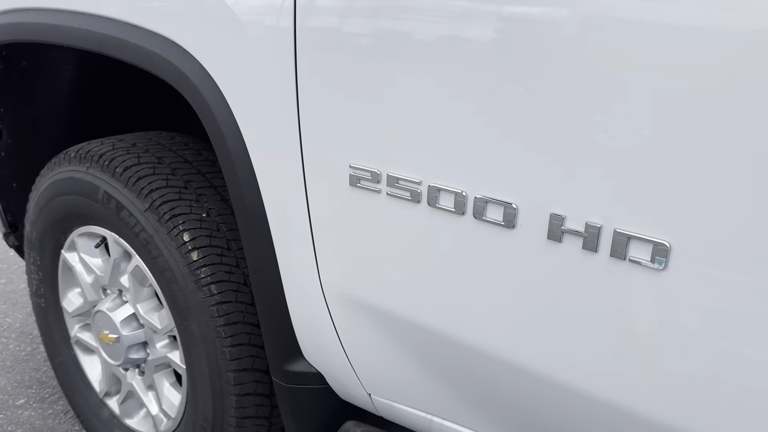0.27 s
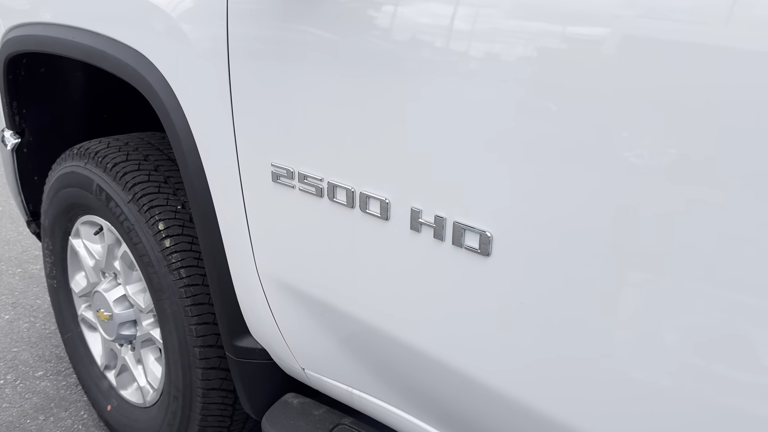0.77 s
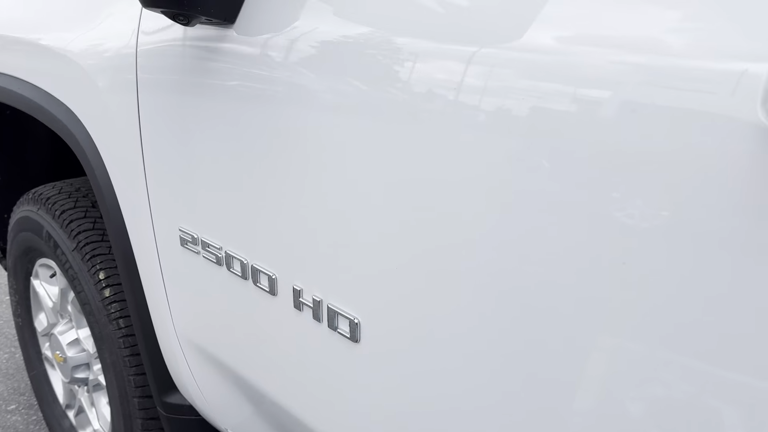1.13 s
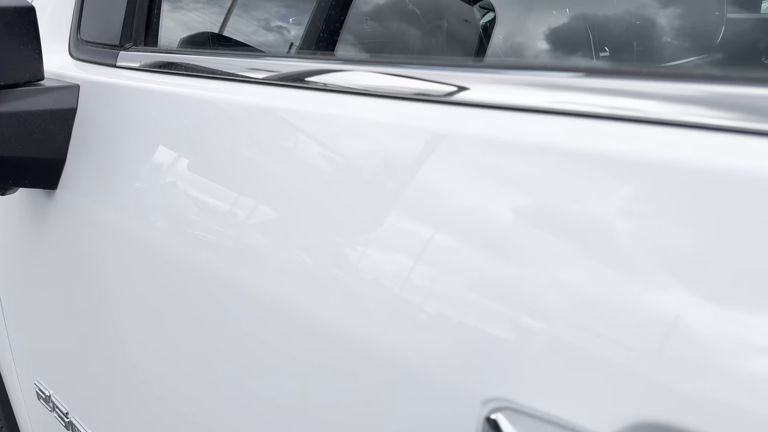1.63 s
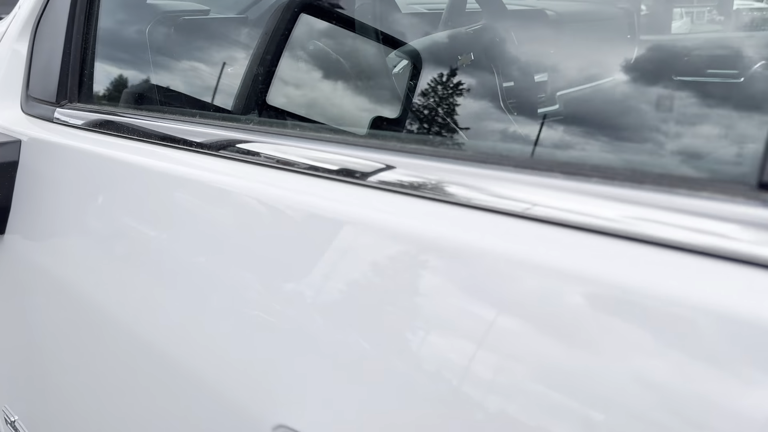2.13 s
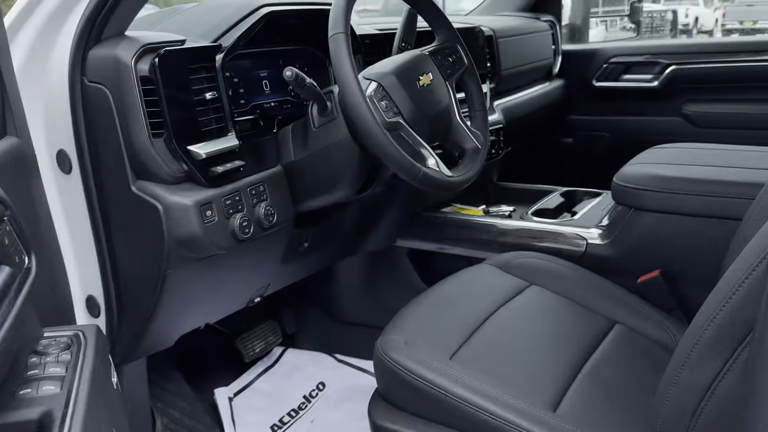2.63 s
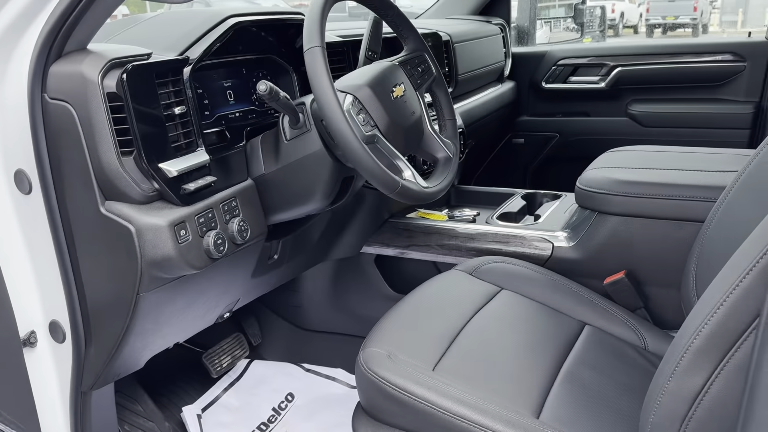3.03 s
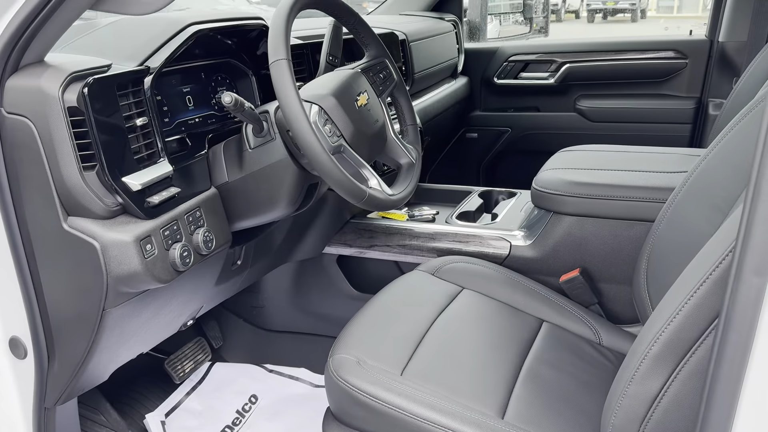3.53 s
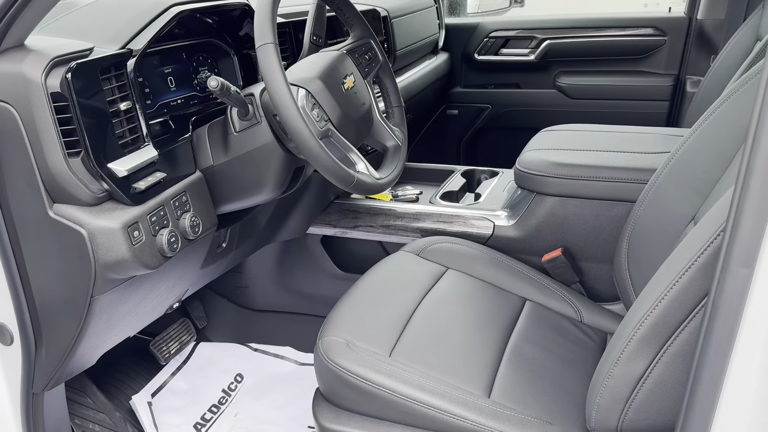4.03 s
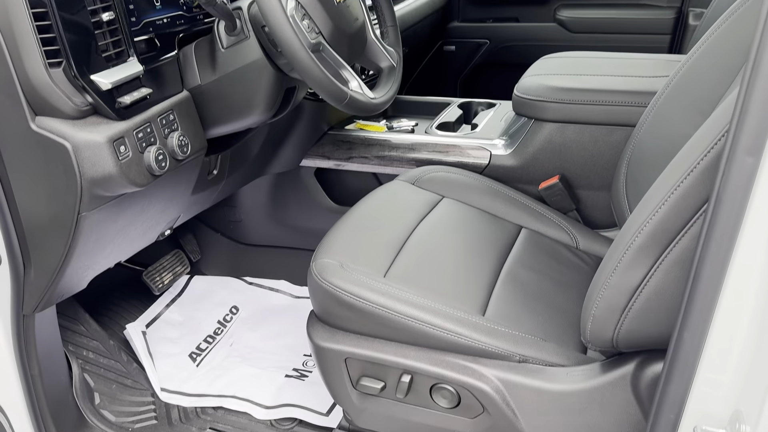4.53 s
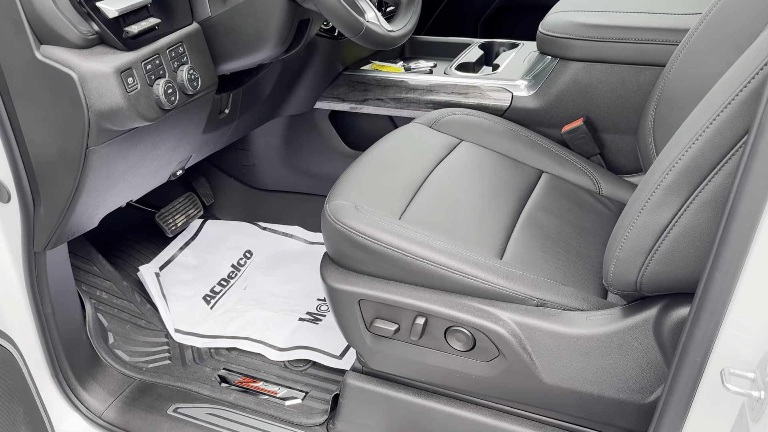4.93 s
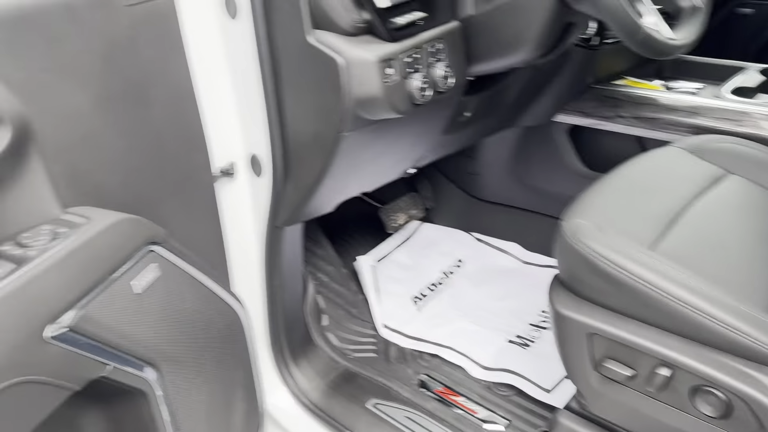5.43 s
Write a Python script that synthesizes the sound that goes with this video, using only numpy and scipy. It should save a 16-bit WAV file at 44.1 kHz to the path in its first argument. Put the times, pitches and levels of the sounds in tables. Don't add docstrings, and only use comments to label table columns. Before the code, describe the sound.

Outdoors, a rough diesel idle rattles on; a door handle is pulled, the latch clacks loudly, then low wind thumps follow and fade.

```python
import sys
import numpy as np
from scipy import signal
from scipy.fft import rfft, irfft, next_fast_len
from scipy.io import wavfile
from scipy.ndimage import uniform_filter1d, map_coordinates

SR = 44100
rng = np.random.default_rng(int(sys.argv[2]) if len(sys.argv) > 2 else 0)


def store_wav(level_fs):
    pcm = np.round(np.clip(np.atleast_2d(level_fs), -1, 1) * 32767)
    wavfile.write(sys.argv[1], SR, pcm.T.astype(np.int16))


def how_loud(loudness_db):
    steps = np.asarray(loudness_db, float) / 20
    return 10 ** steps


N = 251370
T = np.arange(N) / SR
CYCLE_HZ = 5.0025
NOTCH_HZ, NOTCH_WIDTH_HZ = 8900, 900


def unit(x):
    return x / np.sqrt(np.mean(x ** 2) + 1e-20)


def along(points, hz):
    point_hz, value = np.transpose(points)
    return np.interp(np.log(hz + 1), np.log(point_hz + 1), value)


def curves(rows):
    start_s, *columns = np.transpose(rows)
    return [np.interp(T, start_s, column) for column in columns]


def wobble(rate_hz):
    knots = rng.standard_normal(int(N * rate_hz / SR) + 4)
    return map_coordinates(knots, [T * rate_hz])


def filtered(x, response):
    m = next_fast_len(x.shape[-1] + 8192)
    spectrum = rfft(x, m) * response(np.fft.rfftfreq(m, 1 / SR))
    return irfft(spectrum, m)[..., :x.shape[-1]]


def bell(centre_hz, width_hz):
    return lambda hz: 1 / (1 + ((hz - centre_hz) / width_hz) ** 4)


def ports(mid, side):
    return np.array([mid + side, mid - side])


def panned(x, left_right_db):
    return x * how_loud([[left_right_db / 2], [-left_right_db / 2]])


def add_at(out, start_s, sound):
    place = out[:, round(start_s * SR):][:, :sound.shape[-1]]
    place += sound


# start_s, level_db, screen_db (bodywork)
ENGINE = [(0, -45.5, -0.5), (.73, -44.5, 1), (1.06, -42.5, 4.5), (1.65, -43, 10), (2.05, -42, 10),
          (2.4, -45.5, 5.5), (2.82, -47, 3.5), (3.3, -45.5, 5), (3.95, -44.5, 6.5), (4.9, -44, 6.5),
          (5.7, -43.5, 7)]
CLATTER_DB, CLATTER_SCREENED = 4.5, 1.06
HISS_DB, HISS_SCREENED = -2.5, 1.02
HISS_LAG_S = 0.12


def engine_levels():
    level_db, screen_db = curves(ENGINE)
    late_db = np.interp(T - HISS_LAG_S, T, screen_db)
    clatter_db = level_db + CLATTER_DB - CLATTER_SCREENED * screen_db
    hiss_db = level_db + HISS_DB - HISS_SCREENED * late_db
    return level_db, clatter_db, hiss_db


# freq_hz, density_db_per_hz
BLOCK = [(290, -19), (500, -10), (700, -6.5), (950, -8), (1210, -10), (1350, -12.5), (1500, -11.5),
         (1810, -14.5), (2680, -16), (3910, -25.5), (6970, -27), (8530, -37.5), (13000, -31), (15700, -25)]
# freq_hz, density_db_per_hz
BLOCK_SIDE = [(210, -33), (350, -7), (497, -6), (547, -6), (574, -6), (816, -1.5), (2420, -15), (2620, -14),
              (4650, -26.5), (7630, -18.5), (10200, -22.5), (14700, -26), (15900, -31)]
# freq_hz, share
LAG = [(400, .1), (3000, 0.35), (6000, 0.66), (8000, .9), (15000, .85)]


def engine_at_ports():
    a, b = rng.standard_normal((2, N))
    share = lambda hz: np.clip(along(LAG, hz), 0, .99)
    mid = filtered(a, lambda hz: how_loud(along(BLOCK, hz)))
    side = filtered(a, lambda hz: 1j * share(hz) * how_loud(along(BLOCK_SIDE, hz)))
    side += filtered(b, lambda hz: np.sqrt(1 - share(hz) ** 2) * how_loud(along(BLOCK_SIDE, hz)))
    return ports(unit(mid), how_loud(-2.0) * unit(side))


CYLINDERS = [2.8, 3.3, 3.6, 2.6, 1.3, 2.6, 1.6, .8]
NOTCH_DEPTH = .6


def engine_noise():
    block_db, clatter_db, hiss_db = engine_levels()
    turn = T * CYCLE_HZ * 8 + 0.41
    puff_db = np.asarray(CYLINDERS)[turn.astype(int) % 8] + 2.8 * np.cos(2 * np.pi * (turn - .5))
    puff_db = uniform_filter1d(puff_db, size=200) + .7 * wobble(30)
    pair = engine_at_ports()
    high = filtered(pair, lambda hz: 1 / (1 + (6000 / (hz + 1)) ** 3))
    low = filtered(pair, bell(0, 950))
    roar = low * how_loud(block_db + 2.0 + 0.25 * wobble(2.8))
    clatter = (pair - low - high) * how_loud(clatter_db + 3 + 0.44 * puff_db + 0.43 * wobble(8))

    near = np.clip(1 - T / 1.4, 0, 1)
    rattle = near * how_loud(2.5) * np.exp(4 * np.cos(2 * np.pi * (T * CYCLE_HZ - .26)) - 4)
    clatter += rattle * filtered(clatter, bell(1300, 350))

    notch = filtered(high.mean(axis=0), bell(NOTCH_HZ, NOTCH_WIDTH_HZ))
    high = high - NOTCH_DEPTH * np.sqrt(near) * notch
    jets = how_loud(-6) * filtered(high, bell(14300, 1000))
    hiss = how_loud(hiss_db + 8) * (high * how_loud(0.3 * puff_db) + jets * how_loud(2.46 * puff_db))
    return roar + clatter + hiss


# place_in_cycle (0-1), mode_hz, level_db, t60_s, left_right_db
KNOCKS = [(.27, 720, -1.5, .24, 1), (.82, 722, -3, .24, 1), (.55, 725, -5, .16, 0), (.1, 1188, .5, .08, 0),
          (.33, 1195, -5, .08, 0), (.16, 1468, -5.5, .12, 0), (.27, 1500, -5.5, .12, 0),
          (.65, 855, -5, .18, 0), (.85, 668, -5, .12, 0), (.13, 5520, -15, .05, 2),
          (.63, 5500, -15, .05, 2)]


def knocks():
    out, t = np.zeros((2, N + SR)), np.arange(SR // 4) / SR
    for place, mode_hz, level_db, t60_s, left_right_db in KNOCKS:
        for cycle, (size, detune) in enumerate(rng.standard_normal((29, 2))):
            decay = how_loud(level_db - 38 + .6 * size - 60 * t / t60_s)
            attack = 1 - np.exp(-t / 0.0024)
            ring = decay * attack * np.sin(2 * np.pi * mode_hz * (1 + .004 * detune) * t)
            add_at(out, (cycle + place) / CYCLE_HZ, panned(ring, left_right_db))
    return out[:, :N]


# freq_hz, width_hz, level_db
WHINES = [(2310, 11, -63.5), (2607, 22, -61.5), (3410, 19, -67), (878, 33, -56.5), (5520, 42, -74.5),
          (4000, 390, -67), (6100, 23, -85)]
WHINE_SCREENED, DOOR_OPEN_S, DOOR_OPEN_DB = 0.59, 3.7, 3


def whines():
    screen_db = curves(ENGINE)[1]
    clear_db = 3.1 - WHINE_SCREENED * screen_db + DOOR_OPEN_DB * np.tanh(T - DOOR_OPEN_S)
    out = np.zeros(N)
    for freq_hz, width_hz, level_db in WHINES:
        gain = how_loud(level_db + clear_db + 2.2 * wobble(3.02))
        resonance = lambda hz: 1 / (1 + ((hz - freq_hz) / width_hz) ** 2)
        out += gain * unit(filtered(rng.standard_normal(N), resonance))
    return out


def engine_tones():
    level = how_loud(curves(ENGINE)[0] + 45.5)
    return level * (knocks() + whines())


# start_s, level_db, echo_db (strongest line, off the truck's flank)
DRONE = [(0, -33.5, 2), (.3, -32.5, 2), (1.2, -32.5, -2), (1.5, -32, 0), (1.7, -42, 11.5),
         (2.2, -39.5, 9.5), (2.8, -28.5, -2), (3.2, -36, -10), (3.7, -39.5, 0.5), (4.35, -42, -16),
         (4.47, -39, 5.5), (4.8, -39, 11.5), (5.1, -32.5, 4), (5.4, -30.5, -1), (5.7, -33, -1.5)]
# shaft_multiple, level_db
DRONE_ORDERS = [(2, -0.5), (3, 0), (4, -16), (5, -13.5), (6, -11), (9, -14.5), (12, -19), (15, -23.5),
                (18, -26)]
# cycle_multiple, level_db
FIRING = [(8, -11), (12, -8), (16, -3.5), (24, -13)]
DRONE_HZ, DRONE_SAG_HZ_PER_S = 100.04, .33
LOW_LINES_DB, OVERTONES_DB = -1.5, 0.2


def drone():
    level_db, echo_db = curves(DRONE)
    main_db, low_db, high_db = level_db + echo_db, level_db + LOW_LINES_DB, level_db + OVERTONES_DB
    shaft_hz = (DRONE_HZ - DRONE_SAG_HZ_PER_S * T) / 3
    shaft = 2 * np.pi * np.cumsum(shaft_hz) / SR
    lines = []
    for order, order_db in DRONE_ORDERS:
        shade_db = main_db if order == 3 else low_db if order < 5.5 else high_db
        lines.append((shade_db + order_db, order * shaft))
    for order, order_db in FIRING:
        lines.append((low_db + order_db, 2 * np.pi * order * CYCLE_HZ * T))
    out = np.zeros(N)
    for line_db, phase in lines:
        out += how_loud(line_db + 1.5 + 1.1 * wobble(2.56)) * np.sin(phase + 0.25 * wobble(2.91))
    return out


# start_s, flow_db
AIR = [(0, -29.5), (.8, -25.5), (.9, -31.5), (1.55, -30), (1.87, -27), (2.0, -24), (2.25, -29),
       (2.45, -19.5), (2.56, -12.5), (2.65, -17), (2.95, -17.5), (3.01, -30.5), (3.5, -33.5), (3.95, -39.5),
       (4.38, -36), (4.47, -34.5), (5.0, -30.5), (5.7, -35)]
# peak_s, flutter_db, length_s
GUSTS = [(0.204, -51, 0.088), (0.344, -45, 0.09), (0.562, -42, 0.051), (0.77, -42, 0.08), (1.44, -40, 0.1),
         (1.68, -44, 0.089), (1.883, -34.5, 0.15), (2.113, -47, 0.073), (2.178, -34, 0.045),
         (2.374, -37, 0.17), (2.47, -23.5, 0.086), (2.577, -23.5, 0.064), (2.681, -20.5, .045),
         (2.737, -26, 0.027), (2.862, -19, 0.035), (2.938, -16.5, 0.053), (3.146, -29.5, 0.084),
         (3.351, -38, .05), (3.474, -32.5, .05), (3.718, -44, 0.044), (3.89, -38.5, 0.077),
         (4.2, -51, 0.11), (4.464, -41.5, 0.058), (4.676, -44, 0.06), (4.85, -40, 0.054),
         (5.005, -36, 0.098), (5.22, -50, 0.092)]
FLUTTER_DB, FLUTTER_GROWS = -47.5, 1.2
GUST_RISE, GUST_PUSH_DB, GUST_PUSH_GROWS = 0.75, -30.5, 0.49


def air_levels():
    flow_db, = curves(AIR)
    push_power = how_loud(2 * flow_db)
    flutter_power = how_loud(2 * (FLUTTER_DB + FLUTTER_GROWS * (flow_db + 30)))
    for peak_s, gust_db, length_s in GUSTS:
        side_s = np.where(T < peak_s, GUST_RISE * length_s, length_s)
        swell = np.exp(-4 * np.abs(T - peak_s) / side_s)
        flutter_power = flutter_power + how_loud(2 * gust_db) * swell
        push_power = push_power + how_loud(2 * (GUST_PUSH_DB + GUST_PUSH_GROWS * (gust_db + 40))) * swell
    return 10 * np.log10([push_power, flutter_power])


# freq_hz, density_db_per_hz
PUSH = [(12, -35), (20, -15), (54, 4), (87, 5.5), (145, -3), (178, -5), (221, -10), (300, -15.5),
        (390, -25), (660, -120)]
# freq_hz, density_db_per_hz
FLUTTER = [(71, -40), (120, -14), (227, -4.5), (321, -5.5), (382, -4.5), (667, -25.5), (864, -49),
           (1100, -50), (1430, -73), (2420, -120)]


def turbulence():
    out = np.zeros((2, N))
    for level_db, colour, lumps_db, side_db in zip(air_levels(), (PUSH, FLUTTER), (2.5, 3.2), (-7, -9)):
        mid, side = filtered(rng.standard_normal((2, N)), lambda hz: how_loud(along(colour, hz)))
        strength = np.clip((level_db + 45.5) / 25, .2, 1)
        lumps = how_loud(lumps_db * strength * wobble(24))
        out += how_loud(level_db - 2) * lumps * ports(unit(mid), how_loud(side_db) * unit(side))
    return out


# start_s, peak_db, centre_hz
EDDIES = [(0.078, -15, 86.5), (0.237, -10, 69.6), (2.315, -16, 175), (2.531, -2.5, 110), (2.583, -6, 173),
          (2.609, -9.5, 144), (2.655, -13, 91), (2.693, -12, 80), (2.736, -5, 125), (2.774, -13, 91.5),
          (2.854, -2.5, 199), (2.866, -4, 79), (2.912, -4.5, 146), (2.961, -12.5, 96.9),
          (3.101, -26, 72.65), (3.142, -18, 137), (3.244, -21, 60), (3.337, -15, 98), (3.469, -32, 69.66),
          (3.705, -22, 185.8), (3.858, -27, 191.4), (4.991, -12.5, 70)]
# start_s, peak_db, centre_hz
SNAPS = [(2.579, -18, 520), (2.59, -14, 318), (2.68, -10, 265), (2.737, -12, 500), (2.742, -9.5, 388),
         (2.853, -11, 397), (2.934, -11, 405), (2.9355, -14.5, 533), (2.94, -4.5, 251), (2.962, -12.5, 330),
         (2.991, -25, 254), (3.061, -24.5, 247), (3.099, -18.5, 300), (3.151, -20.5, 427),
         (3.175, -20.5, 470), (3.708, -28, 397), (4.17, -30, 266), (1.43, -29, 300), (2.25, -24, 404),
         (3.25, -22.5, 328), (3.35, -28.5, 280), (3.48, -28, 300), (3.88, -28, 400)]


def eddies():
    out, t = np.zeros((2, N)), np.arange(SR // 10) / SR
    events = list(EDDIES) + list(SNAPS)
    for (start_s, peak_db, centre_hz), pan in zip(events, rng.standard_normal(len(events))):
        u = t * centre_hz / 0.95
        swing = how_loud(peak_db + 3.5) * u * np.exp(-u) * np.sin(2 * np.pi * centre_hz * t)
        add_at(out, start_s, panned(swing, 1.8 * pan))
    return out


def air():
    return turbulence() + eddies()


# mode_hz, level_db, t60_s
HANDLE = [(59.4, -4, .12), (148, -5.5, 0.16), (300, 2.5, 0.11), (427, 5.5, 0.043), (610, 11.5, 0.014),
          (910, 0, 0.025), (1175, -2, 0.032), (1490, -9, 0.021)]
# mode_hz, level_db, t60_s
SKIN = [(128, -4.5, 0.17), (253, 3, 0.072), (342, 1, 0.045), (501, 4, 0.078), (616, 0, 0.064),
        (780, -5, 0.045), (953, -14, 0.091), (1271, -12.5, 0.11), (1550, -16, .05), (1970, -21, 0.19),
        (2180, -22.5, 0.1), (2590, -18, 0.031), (2860, -21, 0.024)]


def skin_ring(modes, soft, t):
    ring = np.zeros(len(t))
    for k, (mode_hz, level_db, t60_s) in enumerate(modes):
        decay = how_loud(level_db + 0.49 * rng.normal() - 60 * t / t60_s)
        ring += decay * np.sin(2 * np.pi * mode_hz * t + np.pi * k)
    ring = np.pad(ring, (45, 0))[:len(t)]
    if soft:
        ring = uniform_filter1d(np.pad(ring, (40, 0)), size=80)[:len(t)]
    return ring / np.abs(ring).max()


# freq_hz, lead_rad
PORT_LEAD = [(5000, 1.5), (6500, 1), (8400, -3.5), (10700, 2), (15200, 1.3)]
CLICK_NOTCH = .7


def contact_click(tilt_db, t60_s, t):
    lead = lambda hz: np.exp(.5j * along(PORT_LEAD, hz) * [[1], [-1]])
    tilt = lambda hz: how_loud(tilt_db * np.log2(hz / 4000 + 0.26)) * (hz > 700)
    noise = rng.standard_normal(len(t)) + 0.54 * rng.standard_normal((2, len(t)))
    noise = filtered(noise, lambda hz: lead(hz) * tilt(hz))
    crack = np.e * t / .0007 * np.exp(-t / .0007)
    ring_out = how_loud(-2 - 60 * t / t60_s) * (1 - np.exp(-t / 0.0011))
    dull = filtered(noise, bell(0, 6000))
    click = (noise * crack + dull * ring_out) / noise.std()
    return click - CLICK_NOTCH * filtered(click.mean(axis=0), bell(NOTCH_HZ, NOTCH_WIDTH_HZ))


# start_s, click_db, panel_db, tilt_db_per_octave, left_right_db
LATCH = [
    (1.9154, -46, -9.5, -3, 6),
    (1.921, -50, -10.5, -3, -3),
    (1.9305, -25, -5, -7, -4),
    (2.4202, -22, -16, 5, -1),
    (2.426, -40.5, -9.5, -5, -8),
    (2.4333, -15, -3, -4.5, 3.5),
    (2.454, -50, -9.5, 0, -2),
    (2.542, -45, -42, -6, 14),
]
CLICK_T60_S, CLICK_T60_PER_BLOW_S = .002, .075


def door():
    out, t = np.zeros((2, N)), np.arange(SR // 5) / SR
    for start_s, click_db, panel_db, tilt_db, left_right_db in LATCH:
        t60_s = CLICK_T60_S + CLICK_T60_PER_BLOW_S * how_loud(panel_db) * (click_db > -40)
        modes = HANDLE if start_s < 2.2 else SKIN
        ring = how_loud(panel_db) * skin_ring(modes, click_db < -40, t)
        blow = ring + how_loud(click_db + 2.0) * contact_click(tilt_db, t60_s, t)
        wide = how_loud(-19) * np.roll(ring, 30)
        add_at(out, start_s, panned(blow, left_right_db) + ports(0 * wide, wide))
    return out


def scene():
    return engine_noise() + engine_tones() + drone() + air() + door()


def top_cut(x):
    return signal.sosfilt(signal.butter(12, 16660, fs=SR, output="sos"), x)


def record(dry):
    passband = lambda hz: (hz < 15760) / (1 + (30 / (hz + 1)) ** 4)
    x = filtered(dry, passband)
    mix = x / (1 + np.abs(x / .98) ** 6) ** (1 / 6)
    return top_cut(mix)


dry = scene()
out = record(dry)
store_wav(out)
```